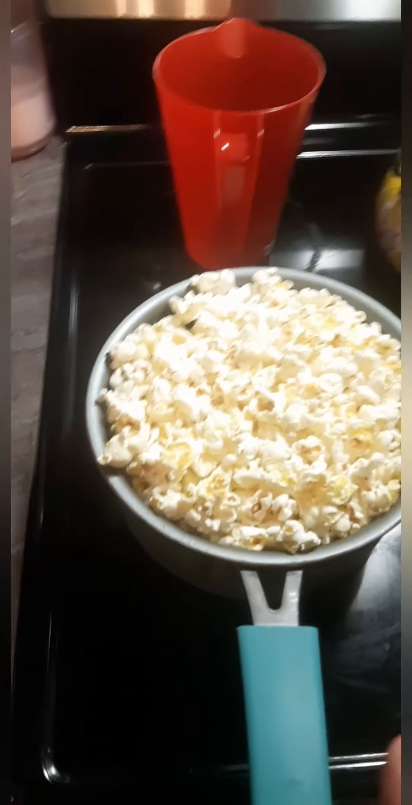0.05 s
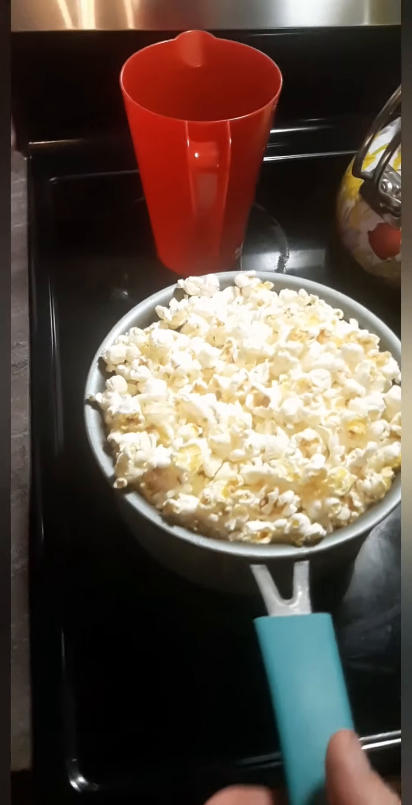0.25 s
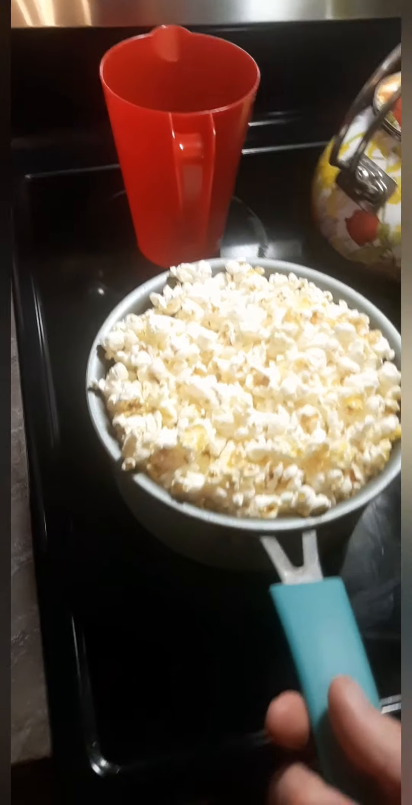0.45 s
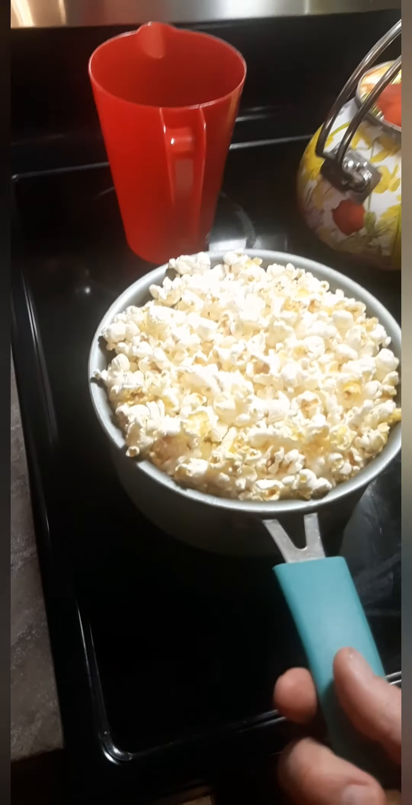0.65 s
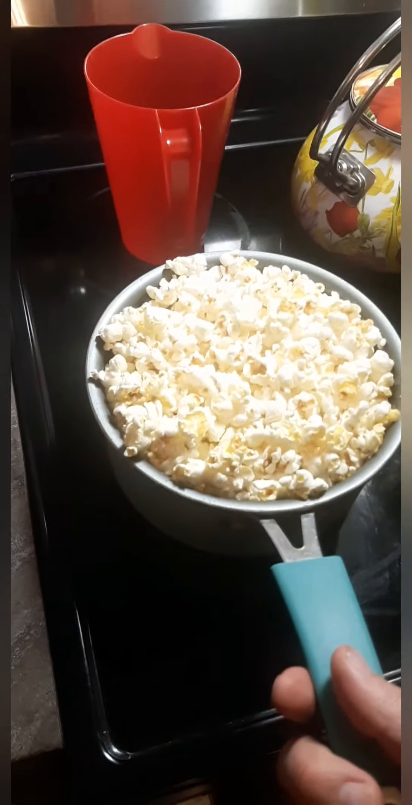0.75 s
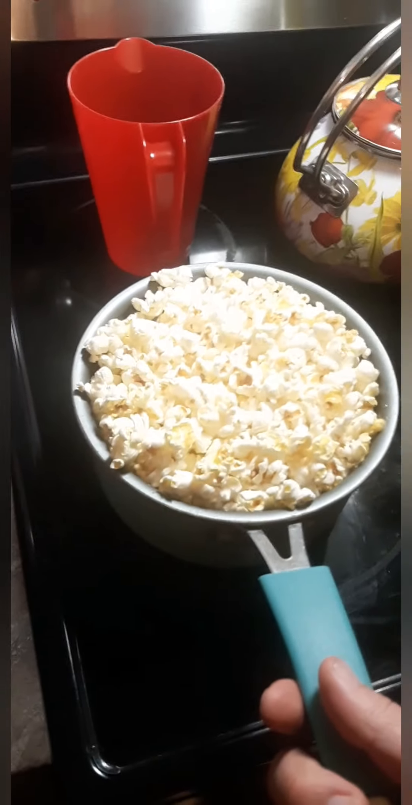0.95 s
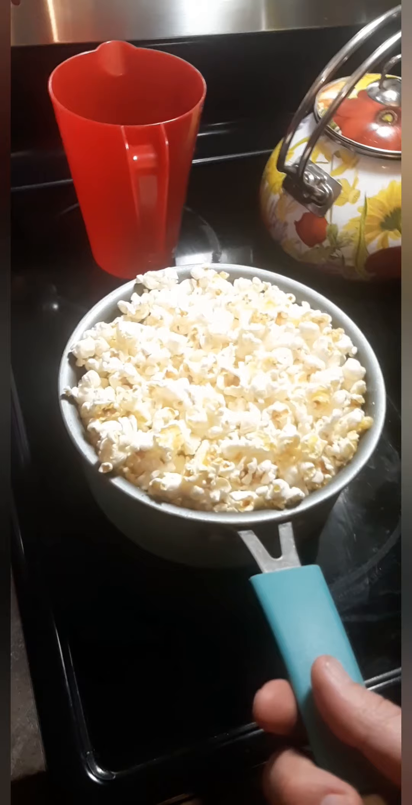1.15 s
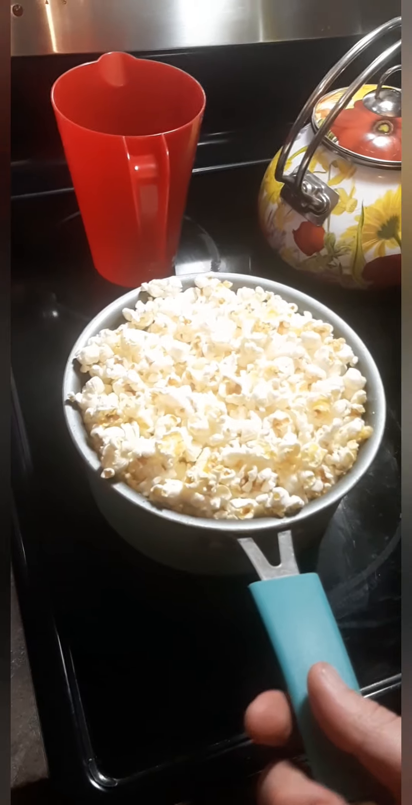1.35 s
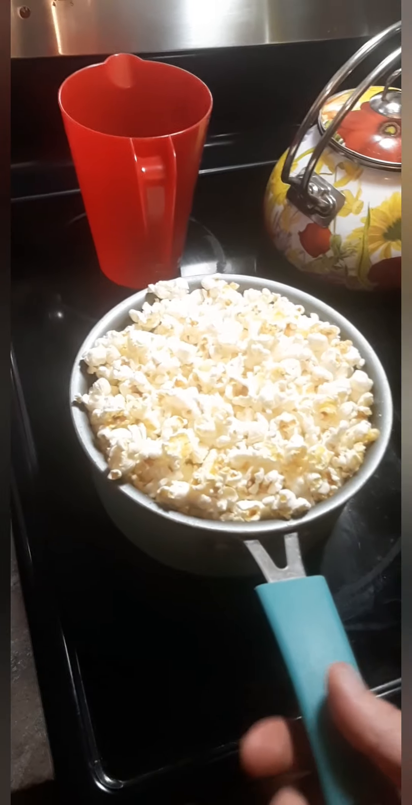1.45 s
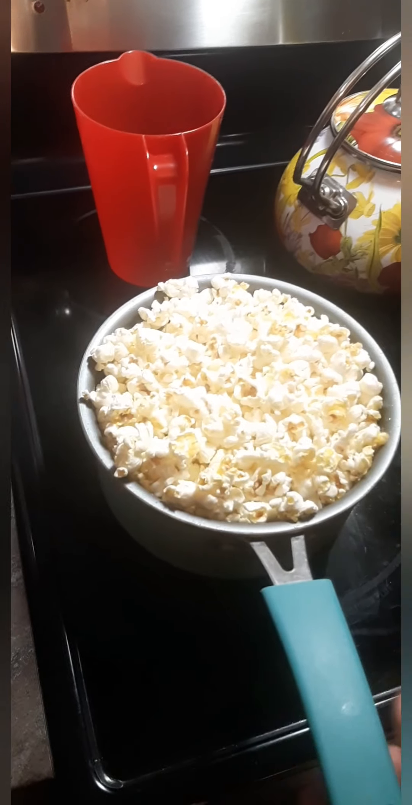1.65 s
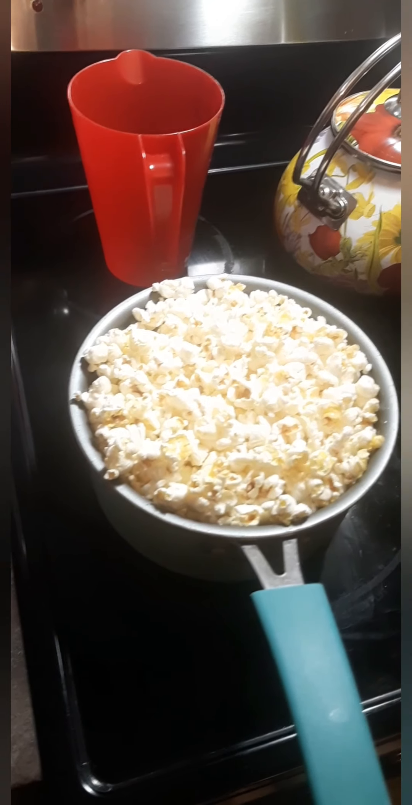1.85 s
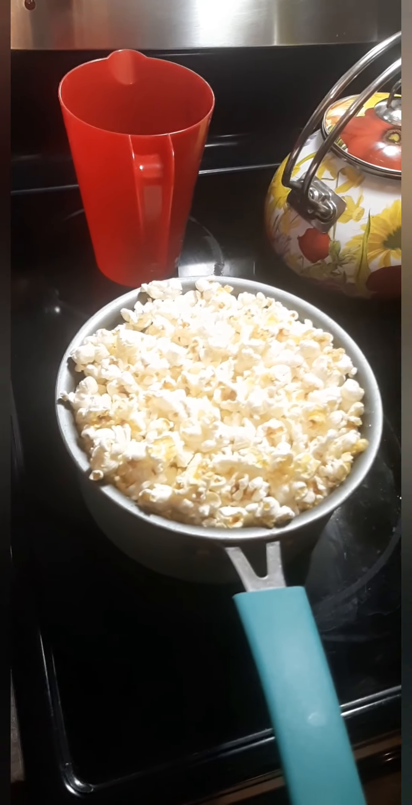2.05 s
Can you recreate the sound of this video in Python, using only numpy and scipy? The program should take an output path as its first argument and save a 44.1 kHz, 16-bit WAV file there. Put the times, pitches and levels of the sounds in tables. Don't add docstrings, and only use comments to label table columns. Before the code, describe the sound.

A single popcorn kernel bursts sharply almost at once in a full metal pot, with a brief rattle and short kitchen tail; then faint sizzle, small spits and dry ticks continue, close stereo microphone.

```python
import sys
import numpy as np
from scipy import signal
from scipy.fft import rfft, irfft
from scipy.io import wavfile
from scipy.ndimage import uniform_filter1d

SR = 44100
rng = np.random.default_rng(int(sys.argv[2]) if len(sys.argv) > 2 else 0)


def gain_from_db(level_db):
    decades = np.asarray(level_db, float) / 20
    return 10 ** decades


def wav_record(signal):
    frames = np.transpose(np.atleast_2d(signal))
    bounded = np.clip(frames, -1, 1)
    quanta = np.round(bounded * 32767).astype(np.int16)
    wavfile.write(sys.argv[1], SR, quanta)


N = 92610

# pitch_hz, width_hz, left_db, right_db
POT_RESONANCES = [(600, 218, 8, 12.5), (1380, 129, 21, 15.5), (1594, 120, 9.5, 8.5), (2186, 310, -11, 8.5),
                  (3040, 1150, 2.5, -14), (3570, 235, -8, 6.5), (4060, 420, -16, 6.5),
                  (6370, 1560, -48.5, 9.5), (8640, 1900, -3, -24), (10060, 1900, -6, 0),
                  (14450, 760, -23, 8)]
# pitch_hz, level_db
OIL_COLOUR = [(150, -21.5), (400, -10), (1000, -11.5), (1800, -8.5), (3000, 1.5), (6000, -0.5), (12000, -2),
              (16000, -9)]


def evened(x):
    return x / np.sqrt(np.mean(x ** 2) + 1e-20)


def read(points, hz):
    f, value = np.transpose(points)
    return np.interp(np.log(hz + 1), np.log(f + 1), value)


def pan(left_db, right_db):
    return gain_from_db(np.array([[left_db], [right_db]]))


def add(mix, start_s, sound):
    part = mix[:, round(start_s * SR):][:, :sound.shape[1]]
    part += sound[:, :part.shape[1]]


def slow(width_s):
    size = round(width_s * SR)
    noise = rng.standard_normal(N)
    return evened(uniform_filter1d(uniform_filter1d(noise, size), size))


def in_pot(x, colour, body=POT_RESONANCES):
    notch_hz, notch_width_hz, notch_share = 2600, 200, 0.9
    hz = abs(np.fft.fftfreq(4096, 1 / SR))
    power = 1
    for f, width, left_db, right_db in body:
        power = power + pan(left_db, right_db) ** 2 / (1 + (2 * (hz - f) / width) ** 2) ** 2
    notch = 1 - notch_share / (1 + (2 * (hz - notch_hz) / notch_width_hz) ** 2)
    log_gain = np.log(gain_from_db(read(colour, hz))) + 0.5 * np.log(power * notch)
    taps = np.fft.ifft(np.exp(np.conj(signal.hilbert(log_gain)))).real[:, :2048]
    taps = taps / np.sqrt((taps ** 2).sum() / 2)
    return signal.fftconvolve(x, taps, axes=1)[:, :N]


def field(gain):
    # pitch_hz, likeness (0-1)
    likeness = [(100, 1), (350, 1), (800, 0.28), (15000, 0.067)]
    frames = SR // 64 + 5
    hz = np.fft.rfftfreq(256, 1 / SR)[:, None]
    t = np.arange(frames) * 64 / SR
    a, b, c, d = rng.standard_normal((frames, 129, 4)).T
    same = np.clip(read(likeness, hz), 0, 1)
    left = a + 1j * b
    right = same * left + np.sqrt(1 - same ** 2) * (c + 1j * d)
    spectra = np.array([left, right]) * gain(hz, t)
    noise = signal.istft(spectra, nperseg=256, noverlap=192)[1][:, :SR] / 8
    return np.pad(noise, [(0, 0), (0, N - SR)])


def snap(t60, scatter):
    t = np.arange(800) / SR
    after = scatter * rng.standard_normal((2, 800))
    return (after - (t == 0)) * gain_from_db(-60 * t / t60)


def pop():
    # start_s, left_db, right_db
    cracks = [
        (.1552, -8, -20),
        (.1557, -18, -7),
        (.1569, -11, -18),
    ]
    # pitch_hz, level_db
    burst = [(60, -26.5), (150, -9.5), (400, -11), (1000, -9.5), (3000, -2), (6500, -1), (11000, -11.5),
             (16000, -13)]
    # pitch_hz, width_hz, left_db, right_db
    heap = [(620, 316, 9, 14), (1294, 155, 10.5, 9.5), (2370, 390, 5, 4), (3120, 700, 5.5, 6),
            (3800, 100, -15, 0), (4440, 190, 4.5, 8), (5700, 120, -12, 5.5), (6330, 360, -7, 8.5),
            (6850, 220, -3, 7.5), (10300, 4200, 3, -1.5), (14900, 1500, 3, 3)]
    # pitch_hz, t60_s
    kitchen = [(100, 0.04), (260, 0.45), (700, 0.44), (1840, 0.32), (4850, 0.18), (12800, 0.17)]
    split_s, split_db, rattle_s, rattle_end_s = 0.1512, -27, 0.1553, 0.16
    crack_db, crack_t60, rattle_t60, echo_s = 13.5, 0.0045, 0.037, 0.1735
    out, t = np.zeros((2, N)), np.arange(N) / SR

    for start_s, left_db, right_db in cracks:
        crack = uniform_filter1d(snap(crack_t60, scatter=0.2), size=3)
        add(out, start_s, crack * gain_from_db(crack_db) * pan(left_db, right_db))

    hiss = gain_from_db(split_db) * rng.standard_normal((2, N))
    out += hiss * np.clip((t - split_s) / 0.00049, 0, 1) * (t < rattle_s)

    def decay(start_s, hold_end_s, level_db, kitchen_share):
        def gain(hz, at):
            t60 = kitchen_share * read(kitchen, hz) + rattle_t60
            return gain_from_db(level_db - 60 * np.maximum(at - hold_end_s, 0) / t60)
        patches = gain_from_db(2.2 * slow(0.0013))
        return field(gain) * np.clip((t - start_s) / 0.00065, 0, 1) * patches

    out += decay(rattle_s, rattle_end_s, -25, 0)
    out += decay(rattle_s, rattle_s, -26, 1)
    out += decay(echo_s, echo_s, -31, 0.6)
    return in_pot(out, burst, heap)


def rings():
    # pitch_hz, t60_s, left_db, right_db
    tones = [
        (106.3, 0.11, -42, -42.5),
        (295, 0.084, -29, -29.5),
        (670, 0.0091, -20.5, -15),
        (625, 0.09, -34, -31.5),
        (860, .03, -27, -31),
        (1266, .03, -23, -31),
        (3160, 0.011, -11, -12.5),
        (4480, 0.011, -21, -30),
        (6620, 0.006, -35, -1),
    ]
    strike_s, right_lag_s, rise_turns = 0.1552, 0.00029, 0.49
    out = np.zeros((2, N))
    t = np.maximum(np.arange(6000) / SR - np.array([[0], [right_lag_s]]), 0)
    for hz, t60, left_db, right_db in tones:
        rise = np.minimum(t * hz / rise_turns, 1)
        tone = -np.sin(2 * np.pi * hz * t) * rise * gain_from_db(-60 * t / t60)
        lead_s = min(0.75 / hz, 0.0012) if hz < 2000 else 0
        add(out, strike_s - lead_s, tone * pan(left_db, right_db))
    return out


def sizzle():
    # time_s, level_db
    heat_curve = [(0, -60), (.36, -59.5), (.42, -58), (.62, -57.5), (.7, -60), (.8, -57), (.96, -59.5),
                  (1.08, -59.5), (1.3, -56), (1.46, -59.5), (1.6, -57), (1.78, -57.5), (2.1, -58)]
    oil_db, wash_db, grains_per_s, grain_spread_db, grain_t60 = -56, -60.5, 2000, 3, 0.006
    s, db = np.transpose(heat_curve)
    heat = gain_from_db(np.interp(np.arange(N) / SR, s, db - np.mean(db)))
    strength = gain_from_db(grain_spread_db * np.minimum(rng.exponential(1, N), 2.5))
    grains = strength * (rng.random(N) < grains_per_s / SR)
    way = rng.integers(0, 16, N)
    t, out = np.arange(800) / SR, np.zeros((2, N))
    for k in range(16):
        path = rng.standard_normal((2, 800)) * gain_from_db(-60 * t / grain_t60)
        out += signal.oaconvolve((grains * (way == k))[None], path, axes=1)[:, :N]
    clumps = gain_from_db(1.6 * 2 * np.tanh(slow(0.01) / 2))
    wash = gain_from_db(wash_db) * rng.standard_normal((2, N))
    return in_pot(heat * (gain_from_db(oil_db) * evened(out * clumps) + wash), OIL_COLOUR)


def spits():
    # start_s, level_db, t60_s, darkness (0-1)
    spit_table = [(0.0644, -39, 0.052, 0), (0.092, -36, 0.037, 0.2), (0.1249, -40.5, 0.32, 0.2),
                  (0.2723, -31, 0.27, 0.25), (0.4668, -43, 0.06, 0.4), (0.5354, -53, 0.029, 0),
                  (0.5544, -41, 0.16, 0.1), (0.637, -40, 0.048, 0.1), (0.6614, -38, 0.054, 0),
                  (0.7267, -44, 0.091, 0), (0.7414, -36, 0.11, 0.03), (0.767, -33, 0.034, 0),
                  (0.8761, -38, 0.092, 0.18), (1.0036, -41.5, 0.097, 0), (1.112, -40, 0.073, 0),
                  (1.1204, -36, 0.063, 0), (1.1594, -36.5, 0.06, 0.5), (1.1872, -33.5, 0.1, 0.84),
                  (1.2121, -32.5, 0.084, 0), (1.262, -36, 0.056, 0.9), (1.3851, -30, 0.047, 0.8),
                  (1.403, -39.5, 0.069, 0.15), (1.5, -47.5, 0.21, 0), (1.5419, -32, 0.081, 0),
                  (1.6222, -36, 0.25, 1), (1.6566, -33, 0.2, 0.62), (1.731, -25.5, 0.057, 0.95),
                  (1.7444, -28.5, 0.079, 1), (1.8537, -43.5, 0.12, 0), (1.8826, -36, 0.08, 0.03),
                  (1.9686, -37, 0.06, 0.04), (2.014, -34.5, 0.047, 0.5)]
    spit_db, tick_db, tick_t60, rise_s, ragged_db = -11, 4, 0.0062, 0.0024, 2
    same = 0.3
    out, t = np.zeros((2, N)), np.arange(6000) / SR
    low = signal.butter(2, 3260, fs=SR)
    for start_s, db, t60, dark in spit_table:
        a, b, c = rng.standard_normal((3, 6000))
        noise = np.array([a, same * a + np.sqrt(1 - same ** 2) * b])
        ragged = gain_from_db(ragged_db * evened(uniform_filter1d(c, size=60)))
        tick = gain_from_db(tick_db - 60 * t / tick_t60)
        puff = ragged * (1 - np.exp(-t / rise_s)) * gain_from_db(-60 * t / t60)
        toned = (1 - dark) * noise + 0.73 * dark * signal.lfilter(*low, noise)
        add(out, start_s, gain_from_db(db + spit_db) * (tick + puff) * toned)
    return in_pot(out, OIL_COLOUR)


def steam():
    # pitch_hz, level_db
    jet_colour = [(1200, -30.5), (2300, -8.5), (4000, -7.5), (6200, -7.5), (6900, 1), (7700, -2.5),
                  (10000, -1.5), (16000, -3.5)]
    start_s, rise_s, end_s, release_t60 = 0.48, 0.012, 0.561, 0.18
    level_db, sag_db, flutter_db = -39.5, -3.5, 1.6
    t = np.arange(N) / SR
    held = np.clip((t - start_s) / (end_s - start_s), 0, 1)
    release = -60 * np.maximum(t - end_s, 0) / release_t60
    db = level_db + sag_db * held + release + flutter_db * slow(0.0005)
    rise = np.clip((t - start_s) / rise_s, 0, 1)
    return in_pot(rng.standard_normal((2, N)) * rise * gain_from_db(db), jet_colour)


def ticks():
    # start_s, level_db, lowest_hz, t60_s
    clicks = [(0.2717, -24.5, 5500, 0.017), (.2795, -39, 6000, .012), (0.5346, -24, 5950, 0.0036),
              (0.5536, -27, 5530, 0.0094), (.5935, -36, 7000, .004), (0.6368, -33, 3500, 0.009),
              (0.7268, -23, 3300, 0.0026), (1.1861, -33, 2000, .005), (1.2118, -32, 3020, 0.011),
              (1.384, -36, 1000, 0.0035), (1.404, -38, 5500, .006), (1.409, -47, 5500, .006),
              (1.501, -36, 2000, .003), (1.5386, -33.5, 2000, 0.0087), (1.731, -36, 400, .005)]
    # pitch_hz, level_db
    click_colour = [(400, -12), (3500, -2), (16000, -6)]
    out = np.zeros((2, N))
    for start_s, db, lowest_hz, t60 in clicks:
        high = signal.butter(4, lowest_hz, "high", fs=SR)
        click = signal.lfilter(*high, snap(t60, scatter=0.51))
        add(out, start_s + 0.0012, click * gain_from_db(1.5 + db))
    return in_pot(out, click_colour)


def blips():
    # start_s, level_db, pitch_hz
    bubbles = [(0.417, -45.5, 1372), (0.504, -51, 1335), (0.545, -56, 1380), (0.603, -49, 1395),
               (0.691, -69, 1380), (0.742, -53, 1387), (0.831, -53.5, 1380), (0.859, -52, 1410),
               (0.915, -56, 463), (0.967, -55, 1430), (1.075, -61, 1380), (1.121, -63, 1370),
               (1.155, -62, 1440), (1.186, -56, 480), (1.267, -55, 1415), (1.348, -53, 1403),
               (1.359, -50, 1380), (1.383, -46, 1345), (1.437, -49, 1380), (1.487, -59, 1370),
               (1.509, -57, 1370), (1.539, -61, 1350), (1.681, -53, 1380), (1.731, -44, 1345),
               (1.791, -51, 1340), (1.812, -58, 1397), (1.968, -56, 1410), (2.004, -56, 1430),
               (2.032, -56, 1370), (2.076, -54, 1430)]
    level_db, rise_s, t60, right_db = -3.5, 0.0028, 0.06, 2
    out, t = np.zeros((2, N)), np.arange(4000) / SR
    for start_s, db, hz in bubbles:
        wander = 1 + 0.046 * evened(uniform_filter1d(rng.standard_normal(4000), size=150))
        phase = 2 * np.pi * hz * np.cumsum(wander) / SR
        lag = np.array([[0], [rng.uniform(-2.2, 1.34)]])
        tone = np.sin(phase + lag) * (1 - np.exp(-t / rise_s)) * gain_from_db(-60 * t / t60)
        add(out, start_s, tone * gain_from_db(db + level_db) * pan(0, right_db))
    return out


def murmurs():
    # middle_s, length_s, level_db, pitch_hz
    swells = [
        (0.095, 0.096, -62.5, 1380),
        (0.79, 0.17, -67.5, 620),
        (.92, 0.065, -67, 520),
        (1.645, .06, -74, 151),
        (1.743, .05, -70, 297),
        (1.13, .05, -62.5, 1356),
        (1.21, .08, -76, 485),
        (1.396, .07, -66, 598),
        (1.608, 0.21, -68, 1390),
        (1.895, 0.15, -68, 620),
    ]
    width_hz = 100
    out = np.zeros((2, N))
    for middle_s, length_s, db, hz in swells:
        a, b = rng.standard_normal((2, 9000))
        edges = [hz - width_hz / 2, hz + width_hz / 2]
        band = signal.butter(1, edges, "band", fs=SR, output="sos")
        noise = signal.sosfilt(band, signal.sosfilt(band, [a + 0.18 * b, a - 0.35 * b]))
        swell = np.sin(np.pi * np.minimum(np.arange(9000) / (length_s * SR), 1)) ** 2
        add(out, max(middle_s - length_s / 2, 0), gain_from_db(db) * swell * evened(noise))
    return out


def thuds():
    # start_s, level_db, pitch_hz, t60_s
    thud_table = [
        (.153, -39, 112, 0.084),
        (.289, -43, 340, .045),
        (0.28, -54, 190, 0.15),
        (.735, -60.5, 105, 0.17),
    ]
    out, t = np.zeros((2, N)), np.arange(14000) / SR
    for start_s, db, hz, t60 in thud_table:
        wander = 1 + 0.16 * evened(uniform_filter1d(rng.standard_normal(14000), size=300))
        tone = np.sin(2 * np.pi * hz * np.cumsum(wander) / SR)
        lump = tone * np.minimum(t / 0.0022, 1) ** 2 * gain_from_db(db - 60 * t / t60)
        add(out, start_s, np.array([lump, lump]))
    return out


def hum():
    # pitch_hz, level_db
    hum_colour = [(30, -17), (54, -0.5), (110, -1.5), (240, -9.5), (450, -3.5)]
    hum_db, handling_db, handling_s = -74.5, 8.5, 0.11
    a, b = rng.standard_normal((2, N))
    hz = np.fft.rfftfreq(N, 1 / SR)
    gain = gain_from_db(read(hum_colour, hz)) / (1 + (hz / 500) ** 4)
    rumble = evened(irfft(rfft([a + 0.54 * b, a - 0.76 * b]) * gain, N))
    settling = np.maximum(1 - (np.arange(N) / SR / handling_s) ** 2, 0)
    return gain_from_db(hum_db + handling_db * settling) * rumble


def scene():
    burst = pop() + rings()
    oil = sizzle() + spits() + blips() + murmurs()
    kernels = steam() + ticks()
    return burst + oil + kernels + thuds() + hum()


def band_limit(x):
    return signal.sosfilt(signal.butter(12, 16970, fs=SR, output="sos"), x)


def record(dry):
    ceiling, edge_hz, top_hz, gate_db = 0.95, 15850, 16900, -52
    soft = ceiling * np.tanh(dry / ceiling)

    def lowpass(hz):
        taps = signal.firwin(511, hz, window=("kaiser", 8), fs=SR)
        return signal.oaconvolve(soft, taps[None], "same")

    below = lowpass(edge_hz)
    top = lowpass(top_hz) - below
    top_power = abs(uniform_filter1d((top ** 2).mean(0), size=80))
    top_db = 10 * np.log10(top_power + 1e-12)
    gate = uniform_filter1d(np.clip((top_db - gate_db) / 6, 0, 1), size=200)
    mix = below + gate * top
    return band_limit(mix)


dry = scene()
out = record(dry)
wav_record(out)
```